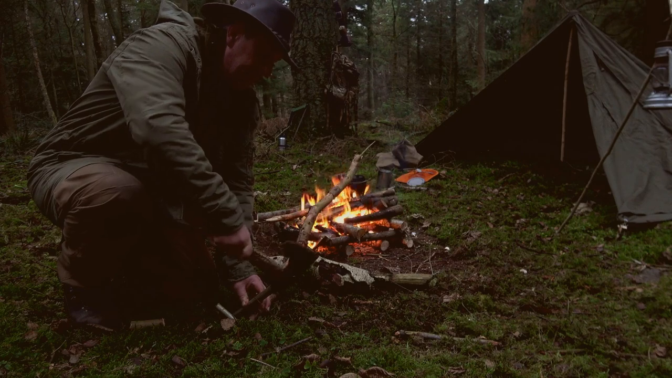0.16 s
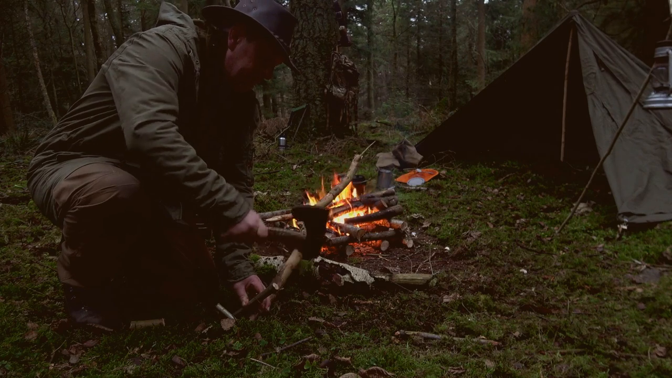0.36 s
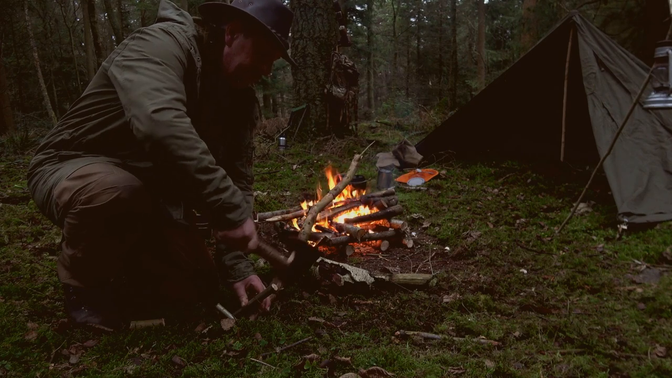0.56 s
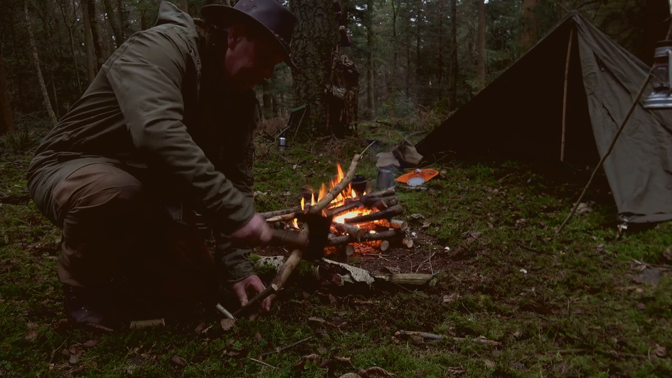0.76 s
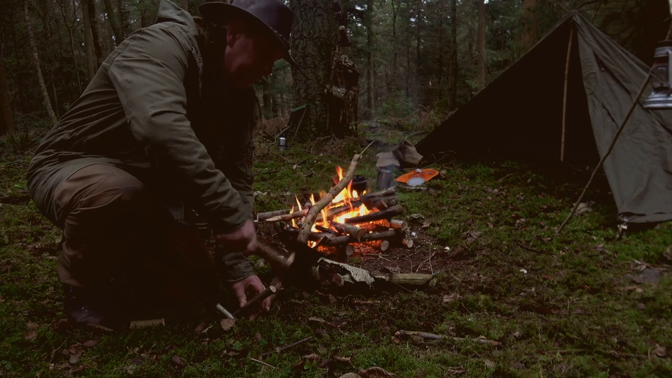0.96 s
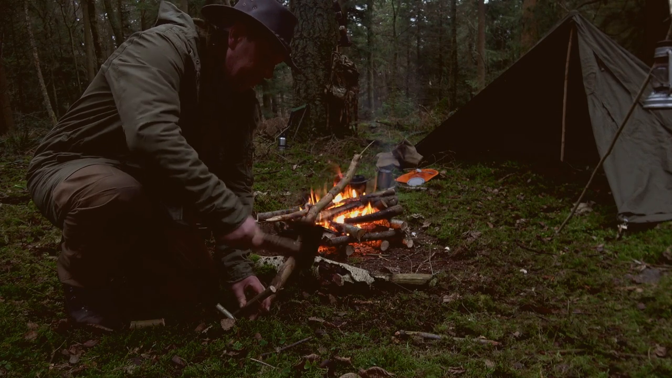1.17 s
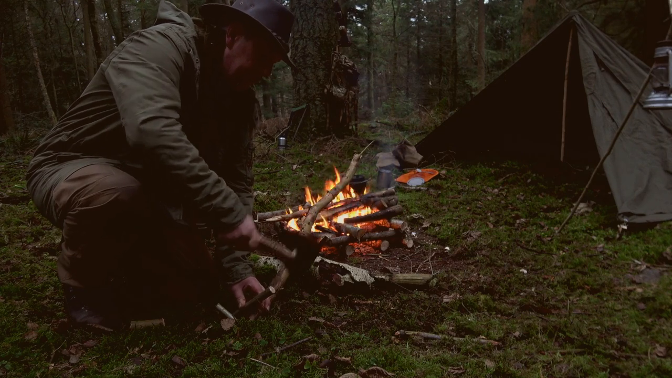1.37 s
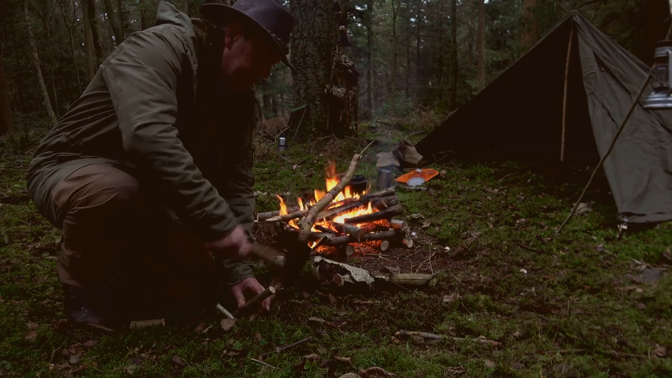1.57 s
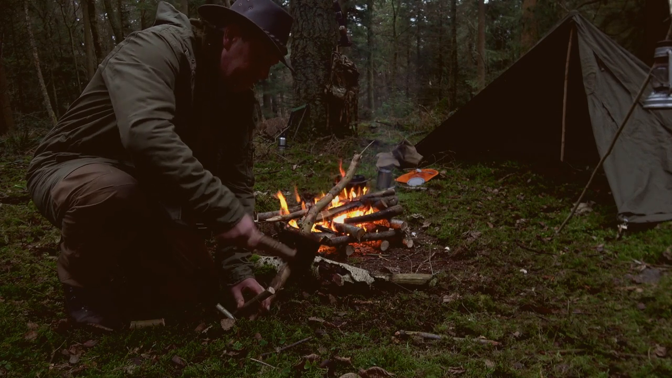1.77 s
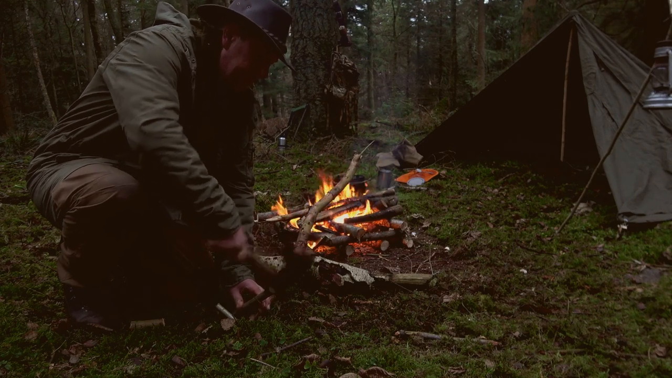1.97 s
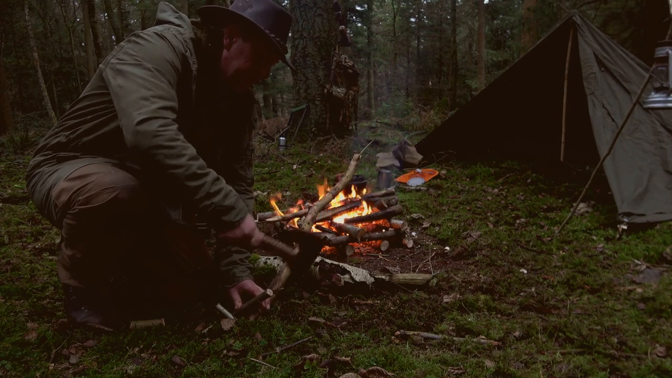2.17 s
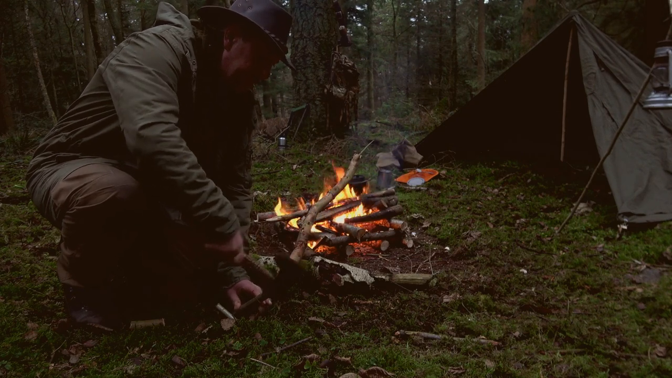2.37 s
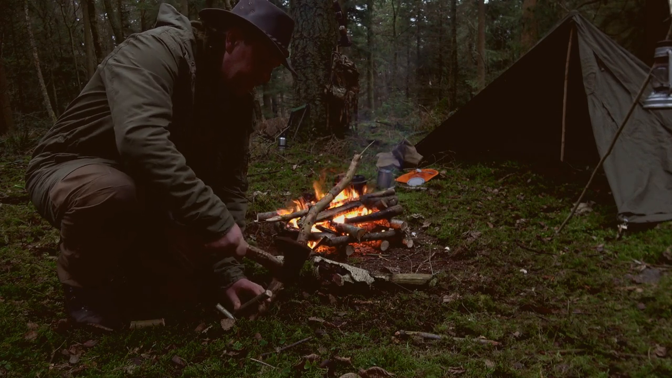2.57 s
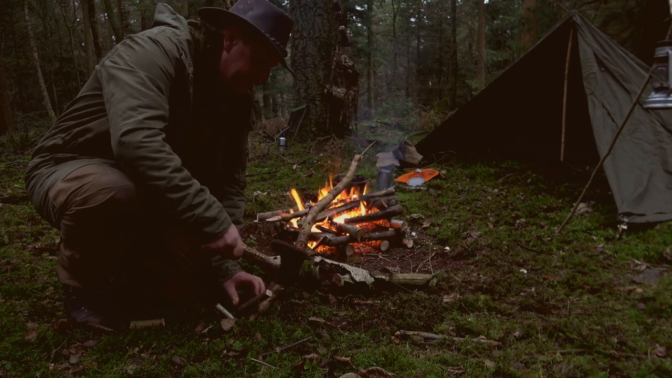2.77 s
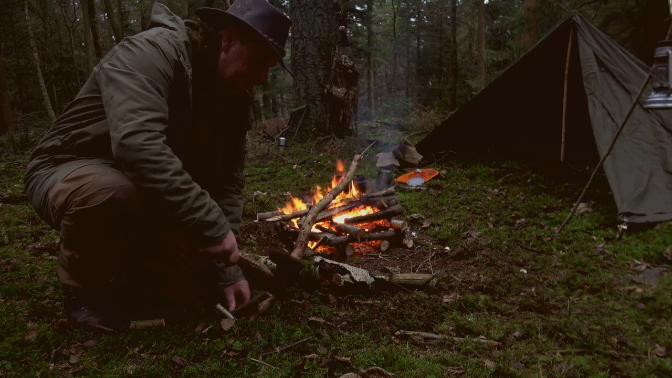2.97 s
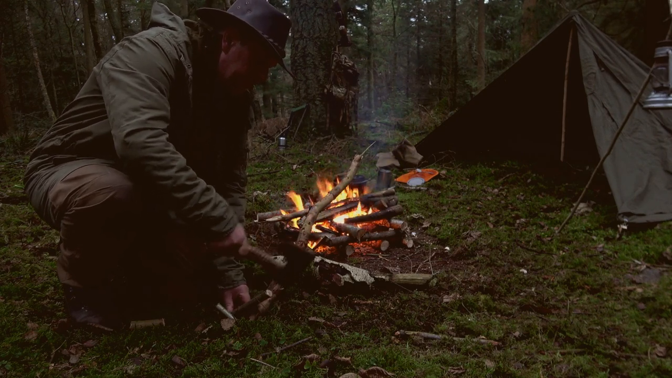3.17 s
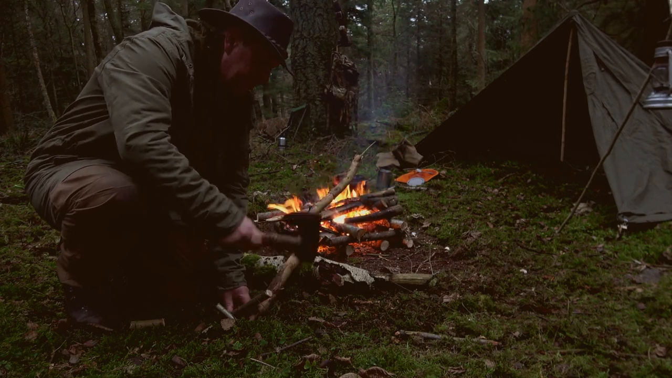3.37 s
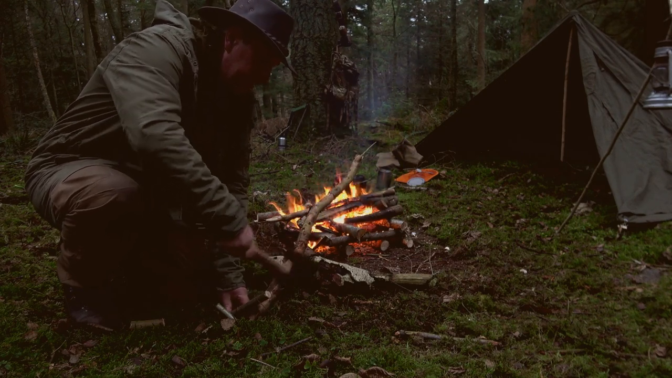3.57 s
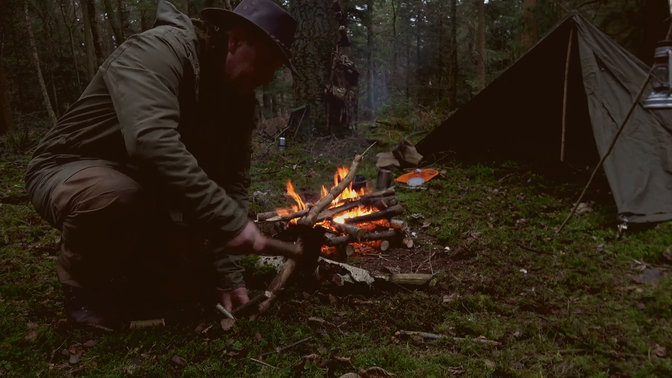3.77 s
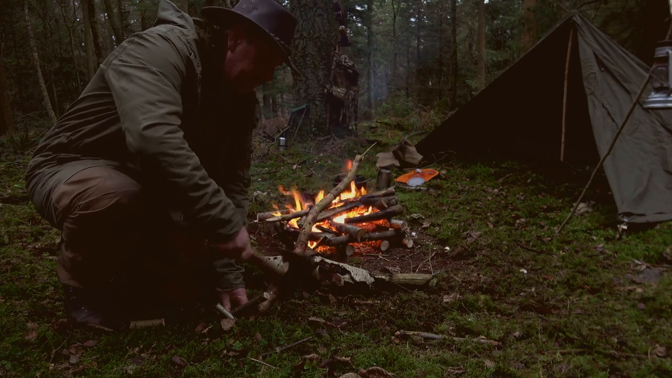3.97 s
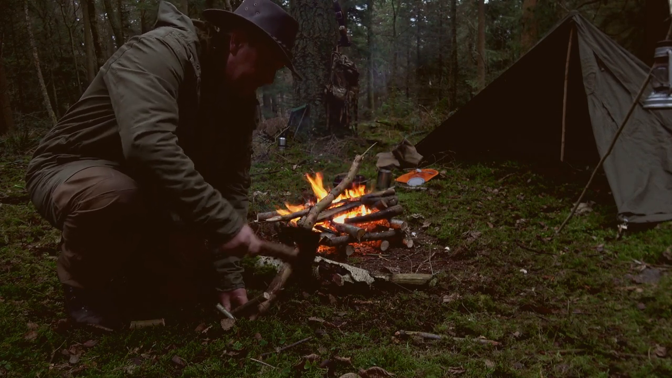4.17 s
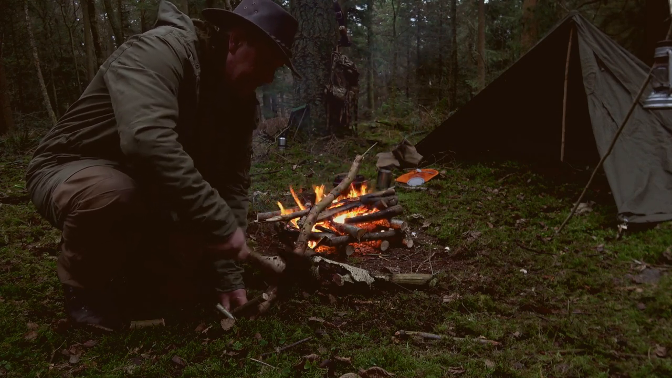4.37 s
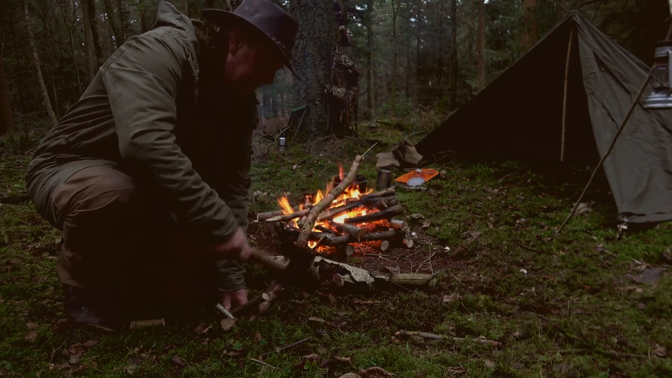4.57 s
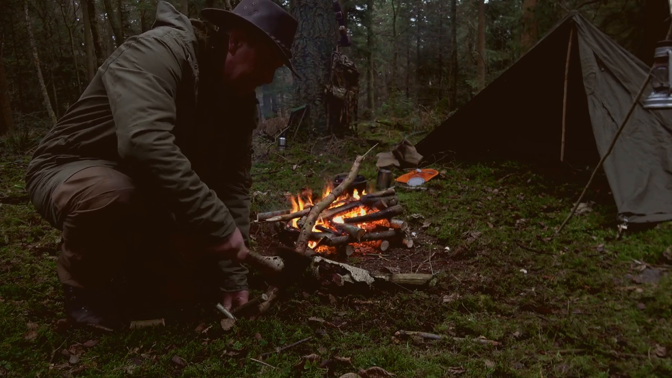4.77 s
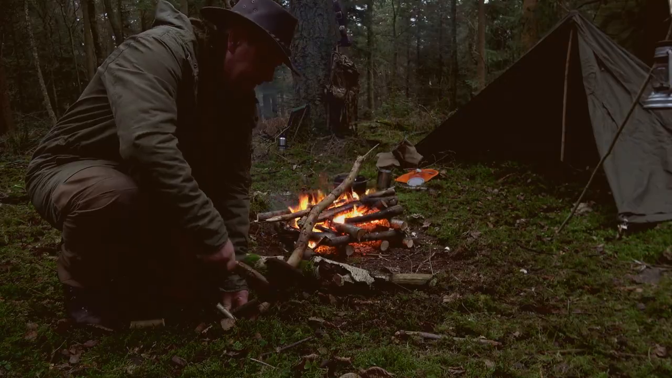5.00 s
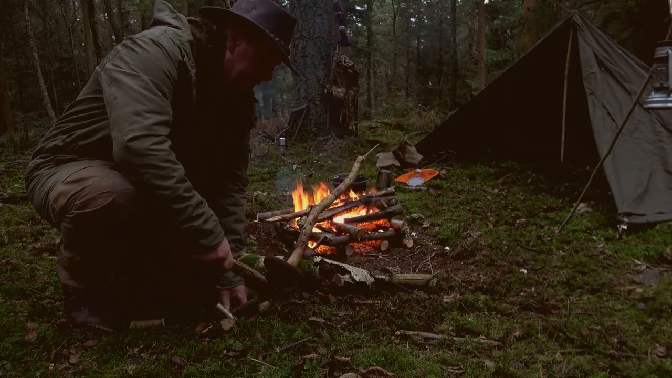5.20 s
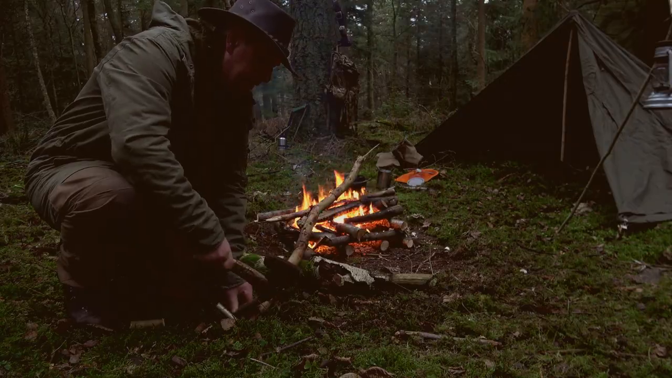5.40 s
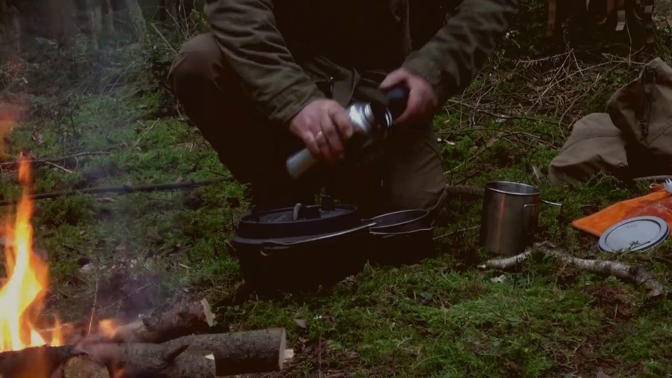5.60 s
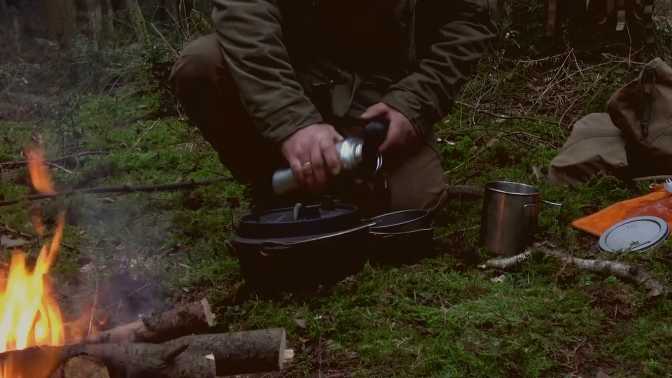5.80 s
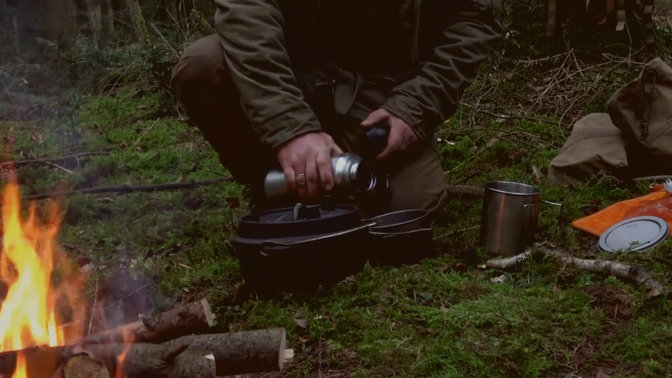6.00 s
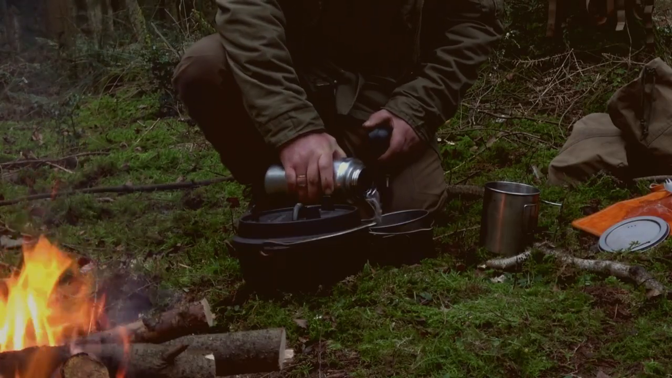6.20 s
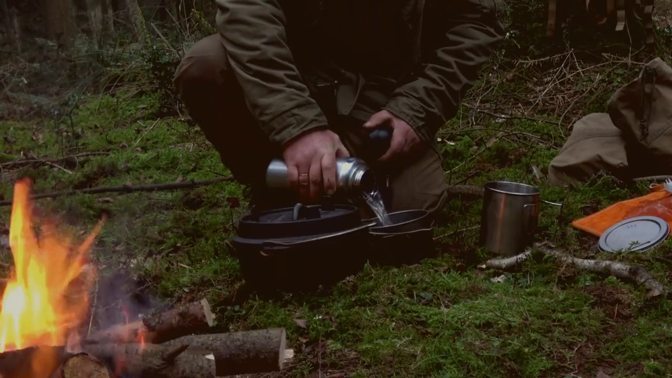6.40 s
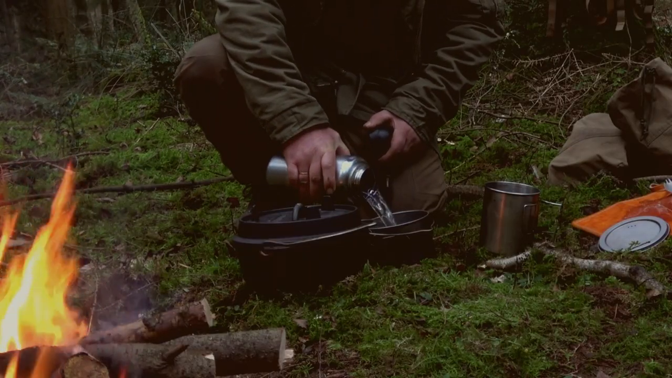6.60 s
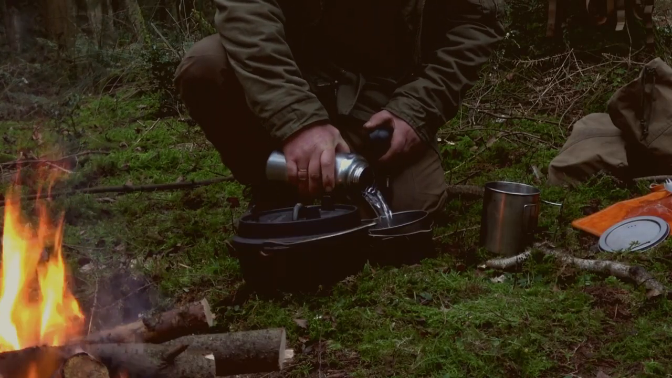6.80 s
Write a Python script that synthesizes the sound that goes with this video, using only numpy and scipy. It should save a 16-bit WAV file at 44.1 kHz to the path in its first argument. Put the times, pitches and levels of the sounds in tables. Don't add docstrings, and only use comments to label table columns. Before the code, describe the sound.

Outdoors in a forest, a hatchet strikes a stick on a log about every 0.4 seconds, with one pause midway. Each sharp woody knock has a splintery edge, a short log thud and a soft low ground thump. Fire hisses and crackles throughout, with wind buffeting the microphone. After the last blow the fire sounds closer, on the left, and water briefly trickles into a pan.

```python
import sys
import numpy as np
from scipy import signal
from scipy.fft import rfft, irfft, next_fast_len
from scipy.io import wavfile
from scipy.ndimage import uniform_filter1d

SR = 44100
rng = np.random.default_rng(int(sys.argv[2]) if len(sys.argv) > 2 else 0)


def store_pcm(level_fs):
    pcm = np.round(np.clip(level_fs, -1, 1) * 32767).astype(np.int16)
    wavfile.write(sys.argv[1], SR, np.atleast_2d(pcm).T)


def volts_from_db(level):
    exponent = np.asarray(level, float) / 20
    return 10 ** exponent


N = 302085
SCENE_CHANGE_S = 5.553

# frequency in Hz, level in dB per Hz.
ROAR_COLOUR = [(30, -32), (55, -2), (259, -13.5), (420, -16), (752, -14), (1240, -13.5), (1500, -22.5),
               (4500, -43.5)]
FAR_HISS_COLOUR = [(1290, -20), (2200, -5.5), (3130, -9.5), (4360, -3.5), (6500, -4.5), (10300, -6.5),
                   (15750, -9.5), (15950, -53)]
NEAR_HISS_COLOUR = [(1290, -7), (2200, 0), (3400, -13), (4000, -5.5), (7160, -1.5), (9860, -9.5),
                    (15750, -7.5), (15950, -45)]
GUST_COLOUR = [(4, -15), (11, -1.5), (22, -6), (35, -12.5), (60, -23), (120, -37), (250, -50.5), (500, -81)]
WOOD_TAIL_COLOUR = [(150, -15), (400, 1), (1200, -7), (2000, -2), (2500, -11.5), (2900, -16.5), (6000, -24),
                    (16000, -36)]
# frequency in Hz, likeness from 0 to 1.
LIKENESS = [(60, 0.61), (180, 0.33), (550, 0.52), (1650, 0.73), (4970, 0.44), (15000, 0.08)]

# time in seconds, level in dB.
BLAZE = [(0, -3.5), (.5, -3.5), (1.14, -0.5), (1.4, -0.5), (2.6, -2), (3.4, 1.5), (4.7, -2), (5.7, -1),
         (6.85, 0)]
# pitch in Hz, width in Hz, level in dB against the hiss.
SAP_STEAM = [
    (4540, 2800, -9),
    (6200, 620, -14.5),
    (7500, 790, -14),
]
# time in seconds, level in dB.
WIND = [(0, -39), (.1, -49.5), (.17, -26.5), (.4, -39), (.55, -31.5), (.78, -27), (1.05, -33.5), (1.3, -27),
        (1.55, -32.5), (1.73, -16.5), (1.96, -20), (2.03, -27.5), (2.25, -29.5), (2.92, -39), (3.14, -26),
        (3.25, -35), (5.0, -51), (6.85, -50.5)]

# start in seconds, peak in dB, pitch in Hz, body in dB, left-right in dB.
SNAPS = [(0.165, -59, 2940, 23, 4), (0.3539, -32.5, 5370, -6, 3), (0.4668, -33.5, 4200, 8, 2),
         (0.8778, -37.5, 3200, 7, 0), (0.9399, -34.5, 7930, -6, -6), (0.9738, -36, 6250, 1, -6),
         (1.1168, -43.5, 7100, 10, 3), (1.935, -42.5, 3700, 0, 7), (2.34, -42, 3400, -6, -1.5),
         (2.378, -24, 4000, -4, 3), (2.4137, -39, 6460, -2, -7), (2.873, -36, 6000, 8, 3),
         (3.1705, -30.5, 6200, 1.5, 4), (3.711, -38, 6900, 8.5, 2), (4.133, -27, 7840, -1.5, 3.5),
         (5.7515, -29.5, 3060, 6, 7)]
# start in seconds, peak in dB, pitch in Hz, left-right in dB.
TICKS = [(0.0058, -33.5, 6100, 3.5), (1.9287, -44, 9600, 0), (2.0112, -42, 11000, 1),
         (0.5764, -40, 4240, -9), (1.0504, -38.5, 9500, -5), (1.1337, -33, 7060, 7),
         (1.2284, -41, 6250, -1), (1.3434, -22, 7450, -5), (1.7194, -42, 8170, 1),
         (2.0044, -23.5, 10200, -4), (2.1843, -42.5, 8400, -4), (2.635, -47, 7700, -16),
         (2.833, -33, 8200, -3), (3.026, -36.5, 5900, 0), (3.061, -43, 3380, 4), (3.1485, -39, 5770, 1.5),
         (3.1887, -40, 7000, -8), (3.2083, -37.5, 6700, 7), (3.284, -37, 7700, -3),
         (3.3175, -25.5, 6200, -4.5), (3.447, -33, 3770, 4), (3.5647, -43, 10400, 2),
         (3.7777, -26, 7880, -4), (3.8171, -44, 8050, -1), (4.372, -36.5, 4910, 8), (4.3963, -42, 7750, -7),
         (4.509, -34.5, 9800, 7), (4.559, -42, 9500, -1), (4.688, -34.5, 5000, 3), (4.747, -44, 5470, 3),
         (5.108, -40, 5960, -0.5), (5.122, -43, 6200, 0), (.125, -48, 5000, 0), (2.676, -46, 8000, 0),
         (1.782, -44, 9500, 0), (4.495, -53, 11000, 0), (6.138, -40.5, 8000, 5.5), (6.443, -39, 11000, 4),
         (6.333, -43, 10000, 4), (6.269, -41, 8000, 4), (6.4375, -39, 5000, 4)]
# start in seconds, peak in dB, pitch in Hz.
NEAR_TICKS = [(5.5608, -28.5, 5560), (5.7015, -34.5, 5700), (5.7197, -27.5, 6200), (5.8628, -31.5, 5440),
              (5.869, -38, 4020), (6.169, -33, 4330), (6.2254, -20, 5640), (6.2656, -31.5, 6940),
              (6.341, -31.5, 6900), (6.355, -42, 6000), (6.408, -35, 5500), (6.4241, -15, 6980),
              (6.4313, -26.5, 7160)]
# start in seconds, peak in dB, pitch in Hz, time to fade 60 dB in seconds.
TICK_CORES = [(.3541, -42.5, 2300, .005), (1.0507, -49, 3600, .004), (1.134, -42, 2800, .004),
              (1.2287, -48, 3500, .004), (1.3437, -34, 3700, .005), (2.0046, -35, 3400, 0.0074),
              (2.0047, -40, 2000, .006), (2.3783, -40, 2620, .005), (3.0273, -41, 3280, .005),
              (3.3178, -41, 2000, 0.0068), (3.7781, -41, 2200, .006), (3.7781, -41, 4200, .004),
              (4.1333, -41, 2200, .006), (4.141, -41, 230, 0.028), (4.5093, -44, 4000, .004),
              (4.5093, -49, 2200, .005), (4.6883, -48, 2300, .005), (1.337, -42, 6000, .004)]

# start in seconds, knock peak in dB, then stick, edge and splinter in dB against the knock.
CHOPS = [(0.1911, -8.5, -4, -9, -9.5), (0.5555, -9, 0, 0, -6.5), (0.9211, -6.5, 4.5, -1, -9.5),
         (1.3209, -7.5, -5, -2, -3.5), (1.6925, -13, -4, -28, 4.5), (2.0723, -3.5, -12, -4, -7.5),
         (2.465, -13.5, 0.5, -9, -13), (3.55, -7, 0, -1, -3), (3.9314, -7.5, 3, 7, -10.5),
         (4.335, -9.5, 2, 0.5, -18), (4.7085, -17.5, 13, 3.5, -2.5), (5.057, -9, -1.5, -13, -3)]
# log in Hz, upper log in Hz, knock in Hz, stick in Hz,
# split-face peak in dB.
WOOD_PITCHES = [(271, 672, 1280, 1780, -10), (282, 690, 1237, 2025, -19), (234, 830, 1236, 2050, -25.5),
                (389, 604, 1214, 1790, -25), (433, 600, 1103, 2130, -46), (218.5, 760, 1160, 1970, -43),
                (292, 670, 1310, 1950, -18), (276, 740, 1225, 2056, -11), (233, 614, 1245, 1990, -9.5),
                (231, 660, 1380, 1990, -10.5), (428, 693, 1390, 1974, -36), (367, 692, 1434, 2120, -17)]
# thud peak in dB, second thud in Hz, its level in dB against the first,
# upper peak in dB, shove into the soil in dB.
LOG_BLOWS = [(-18, 390, -22.5, -19, -23.5), (-18, 345, -10, -19, -21), (-22.5, 418, -4, -19, -23),
             (-19, 180, -1.5, -35, -20), (-15.5, 262, -4.5, -35, -22.5), (-22.5, 475, -2, -22.5, -23.5),
             (-19.5, 340, -7, -20, -23.5), (-18.5, 377, -13.5, -24.5, -21.5), (-23.5, 610, -1, -24.5, -21),
             (-20.5, 364, -5, -17, -23), (-17, 326, -2, -19, -24), (-17.5, 286, -4, -21, -22.5)]
# edge in Hz, split face in Hz, splinter in Hz, lateness in ms.
BRIGHT_PITCHES = [(3600, 2910, 7000, -0.19), (4200, 3700, 6850, -0.13), (4580, 3300, 8500, -1),
                  (4400, 2500, 7300, 0), (4080, 3100, 6500, -0.24), (4100, 2800, 6640, -.3),
                  (4160, 2540, 7200, 0.24), (4030, 2750, 6700, -1.4), (3920, 2720, 6700, -.5),
                  (4040, 2720, 5600, 0), (4100, 4600, 8360, -0.26), (3750, 2830, 6100, -1.1)]
# multiple of the part's pitch, level in dB, time to fade 60 dB in seconds.
KNOCK_MODES = [(.85, -48, 0.0046), (1, 17.5, 0.012), (1.28, -5, 0.042)]
STICK_MODES = [(.88, 0.5, 0.0024), (0.999, 1.5, 0.015), (1.141, -16.5, 0.012)]
EDGE_MODES = [(.8, -4.5, 0.0036), (1, 0.5, 0.0052), (1.25, -10, 0.0027), (1.5, -9.5, .003),
              (1.9, -13.5, .003), (2.6, -21, .003)]
SPLINTER_MODES = [(.69, -6, .004), (.87, -3, .005), (1, 0, .006), (1.24, -7, .004), (1.57, -13, .003)]
UPPER_LOG_MODES = [(0.98, 0, 0.034)]
SPLIT_FACE_MODES = [(1, 0, 0.0043)]
# pitch in Hz, peak in dB, time to fade 60 dB in seconds.
LOG_RING = [(205.8, -41, .06), (556, -30.5, 0.078), (1510, -34, 0.053)]
# start in seconds, peak in dB,
# pitch in Hz.
REBOUNDS = [(.0058, -44, 1530), (.0059, -36, 2590), (.248, -52, 2020), (.576, -33, 2040),
            (0.9334, -18, 744), (0.935, -22.5, 1190), (1.375, -43.5, 1770), (1.713, -36.5, 1970),
            (2.081, -19.5, 1150), (2.09, -21, 753), (3.95, -47, 2000), (4.134, -45, 456),
            (4.728, -52, 1930), (5.7502, -33.5, 1040), (5.7502, -42, 520)]
# start in seconds, peak in dB, pitch in Hz, time
# to fade 60 dB in seconds.
SHORT_RINGS = [(.1915, -25, 4900, .004), (.192, -25, 960, 0.0072), (.19194, -25.5, 3600, .005),
               (.5564, -26, 770, .01), (.55625, -17, 2030, .012), (1.3213, -19, 1010, .008),
               (2.073, -20, 4350, .006), (2.0736, -23, 900, .01), (2.4658, -24, 690, 0.013),
               (2.467, -28, 400, 0.023), (3.5515, -29, 550, .015), (3.5505, -23.5, 3500, .006),
               (4.3358, -26, 690, .012), (4.709, -27, 600, 0.014), (.9225, -26, 290, .025),
               (.9219, -21, 3400, .005), (.5565, -35, 2200, .008), (.5565, -29, 2700, 0.0055),
               (.9221, -15, 2350, .007), (.9221, -25, 2900, .006), (.9225, -23, 460, .025), (.934, -31, 745, .09),
               (1.3212, -18, 2700, .007), (1.344, -30, 3600, .008), (1.6935, -18.5, 680, 0.016),
               (2.0735, -21, 460, .02), (2.085, -31, 750, .1), (2.466, -14, 3400, 0.0054),
               (2.4661, -19, 1900, 0.01), (3.5522, -30, 370, 0.018), (3.5506, -17, 1030, 0.0086),
               (3.9322, -20, 1540, .01), (6.2257, -30, 4600, .004), (6.4244, -27, 4400, .004),
               (1.693, -29, 4900, .004), (2.073, -26, 3750, .005), (.1918, -24, 1560, .01),
               (3.9383, -28.5, 6700, .005), (3.9532, -40, 4250, .015), (3.9325, -20.5, 660, .02),
               (3.9322, -20, 2350, 0.0055), (3.9334, -15.5, 5800, .005), (4.3375, -18, 5400, 0.0055),
               (5.058, -10.5, 1200, 0.0088), (5.068, -37, 1400, .03), (5.069, -42, 2100, .025)]
# time of the blow in seconds, level in dB.
GRAZES = [
    (1.693, -34),
    (2.465, -35.5),
]

# start in seconds, end in seconds, pitch in Hz, level in dB.
WHISTLES = [
    (4.78, 5.03, 7450, -68),
    (2.55, 2.75, 5800, -76),
]
# time in seconds, fizz level in dB.
POUR_FLOW = [(0, -100), (6.575, -82), (6.605, -60), (6.645, -64), (6.685, -59), (6.72, -57), (6.755, -53),
             (6.78, -56), (6.85, -53)]
# start in seconds, peak in dB, pitch in Hz, time to fade 60 dB in seconds.
BUBBLES = [(6.598, -47, 10900, 0.018), (6.608, -41, 5870, 0.034), (6.618, -35, 8000, 0.015),
           (6.669, -43, 4820, 0.04), (6.679, -39, 4780, 0.04), (6.691, -40, 6200, 0.027),
           (6.715, -53, 5800, 0.018), (6.73, -52, 4400, 0.034), (6.738, -49, 9300, 0.037),
           (6.749, -42, 8100, 0.018), (6.76, -36, 5600, 0.02), (6.802, -40, 3960, 0.034),
           (6.839, -38, 1290, .04), (6.755, -36, 910, 0.022), (6.82, -32, 756, 0.026),
           (6.837, -36, 713, 0.094), (6.84, -38, 1800, 0.053)]
# start in seconds, peak in dB, pitch in Hz.
DROPLETS = [(6.609, -43, 6900), (6.622, -47, 9800), (6.638, -48, 4100), (6.68, -47, 9900),
            (6.695, -43, 5200), (6.698, -46, 11100), (6.713, -43, 5900), (6.722, -47, 9400),
            (6.758, -44, 4600), (6.762, -42, 6300), (6.764, -48, 2600), (6.785, -45, 5200),
            (6.797, -45, 4320), (6.806, -42, 5000), (6.811, -44, 7600), (6.841, -44, 9000),
            (6.843, -42, 4700), (6.575, -44, 1150), (6.616, -45, 1240), (6.77, -44, 1500)]


def rms_one(x):
    return x / np.sqrt(np.mean(x ** 2) + 1e-20)


def in_time(rows):
    s, value = np.transpose(rows)
    return np.interp(np.arange(N) / SR, s, value)


def at_hz(points, hz):
    point_hz, value = np.transpose(points)
    return np.interp(np.log(hz), np.log(point_hz), value)


def filtered(x, order, hz, kind):
    return signal.sosfilt(signal.butter(order, hz, kind, fs=SR, output="sos"), x)


def drift(rate_hz):
    r = np.exp(-80 * np.pi * rate_hz / SR)
    slow = signal.lfilter([1], [1, -2 * r, r * r], rng.standard_normal(N // 40 + 2002))[2000:]
    return np.interp(np.arange(N) / 40, np.arange(len(slow)), rms_one(slow))


def ring(clicks, hz, t60):
    r = volts_from_db(-60 / (t60 * SR))
    w = 2 * np.pi * min(hz, SR / 2.2) / SR
    return signal.lfilter([0, np.sin(w)], [1, -2 * r * np.cos(w), r * r], clicks + 1e-18)


def tapped(hz, t60):
    click = np.zeros(SR // 5)
    click[0] = 1
    return ring(click, hz, t60)


def struck(force, modes, detune, unit_hz=1):
    x = 0
    for ratio, db, t60 in modes:
        luck_db, stray = rng.standard_normal(2) * [1.5, detune]
        x = x + volts_from_db(db + luck_db) * ring(force, unit_hz * ratio * (1 + stray), t60)
    return x / np.abs(x).max()


def coloured(spectrum, size, alike=None):
    hz = np.maximum(np.fft.rfftfreq(size, 1 / SR), 1)
    mid, side = rfft(rng.standard_normal((2, size))) * volts_from_db(at_hz(spectrum, hz))
    c = np.clip(at_hz(LIKENESS, hz) if alike is None else alike, 0, 1)
    return rms_one(irfft(np.sqrt(1 + c) * mid + np.sqrt(1 - c) * side * [[1], [-1]], size))


def add(out, s, sound, pan_db=0):
    i = round(s * SR)
    out[:, i:i + sound.shape[-1]] += (sound * volts_from_db([[pan_db / 2], [-pan_db / 2]]))[:, :N - i]


def at_ports(x, lag_s):
    size = next_fast_len(N)
    lag = np.exp(-2j * np.pi * np.fft.rfftfreq(size, 1 / SR) * np.array([[0], [lag_s]]))
    return irfft(rfft(x, size) * lag, size)[:, :N]


def sap(swing_db=4):
    out, white = 0, rng.standard_normal((2, N))
    for hz, width_hz, db in SAP_STEAM:
        wheeze = filtered(white, 1, [hz - width_hz / 2, hz + width_hz / 2], "band")
        out = out + volts_from_db(db + swing_db * drift(5.7)) * rms_one(wheeze)
    return out


def forest():
    near = np.arange(N) >= SCENE_CHANGE_S * SR
    blaze_db, size = in_time(BLAZE), next_fast_len(N)
    roar_db = -55.5 + 0.63 * blaze_db + 5 * near + 2 + .7 * drift(8)
    hiss_db = -61 + blaze_db + 4 * near + 1 + .6 * drift(15)
    roar = coloured(ROAR_COLOUR, size)[:, :N] * volts_from_db(roar_db)
    far_hiss = coloured(FAR_HISS_COLOUR, size)[:, :N]
    near_hiss = coloured(NEAR_HISS_COLOUR, size, alike=0.04)[:, :N]
    hiss = (np.where(near, near_hiss, far_hiss) + sap()) * volts_from_db(hiss_db)
    return roar * volts_from_db([[.9], [-.9]]) + hiss * volts_from_db([[.3], [-.3]])


def wind():
    lumps = volts_from_db([2 * drift(5), 2 * drift(5)])
    gust = coloured(GUST_COLOUR, next_fast_len(N), alike=0.35)[:, :N]
    gust = gust / np.sqrt(uniform_filter1d(gust ** 2, SR // 6))
    strength_db = np.maximum(in_time(WIND), -55)
    return volts_from_db(strength_db - 3.0) * rms_one(gust * lumps) * volts_from_db([[1.5], [-1.5]])


def crackle(per_s=60, level_db=-52):
    sizes = volts_from_db(np.minimum(rng.exponential(1, N), 4)) * (rng.random(N) < per_s / SR)
    dealt = rng.integers(0, 8, N)
    pitches = np.geomspace(2000, 12000, 8)
    ticks = sum(ring(sizes * (dealt == k), hz, 12 / hz) for k, hz in enumerate(pitches))
    return volts_from_db(level_db) * ticks * np.ones((2, 1))


def pops():
    out, t = np.zeros((2, N)), np.arange(SR // 40) / SR
    echo_share, echo_cycles = 0.2, 1.7
    ticks = [(s, db, hz, -7, pan_db) for s, db, hz, pan_db in TICKS]
    near_ticks = [(s, db, hz, -15, 4) for s, db, hz in NEAR_TICKS]
    for s, db, hz, body_db, pan_db in SNAPS + near_ticks + ticks:
        spark = (t == 0) + 0.048 * rng.standard_normal(len(t)) * np.exp(-t / 0.0023)
        spark = spark + echo_share * np.roll(spark, round(echo_cycles / hz * SR))
        edge_db = 11 if s > SCENE_CHANGE_S else -7.5
        edge = volts_from_db(edge_db) * filtered(spark, 2, 11000, "high")
        click = filtered(spark, 2, [2660, 10500], "band")
        click = filtered(click, 1, [0.88 * hz, min(2.9 * hz, 16000)], "band")
        modes = [(1.17, 6.0, 0.003), (1.3, 1.0, 0.0058), (0.67, -49.0, 0.00067)]
        bright = struck(click, modes, 0.12, hz) + 2.67 * click / np.abs(click).max()
        dull = filtered(spark, 2, [700, 2920], "band")
        body_ring = struck(dull, [(1230, 0.0081, 0.0025), (2320, 0, 0.02)], 0.094)
        body = dull / np.abs(dull).max() + 0.13 * body_ring
        pop = volts_from_db(db - 2) * (bright + edge + volts_from_db(body_db - 3) * body)
        add(out, s + .0003, pop[None], np.clip(pan_db, -7, 7))
    return out


def rebounds():
    out = np.zeros((2, N))
    for s, db, hz in REBOUNDS:
        add(out, s, volts_from_db(db) * tapped(hz, 22 / hz)[None], pan_db=0.5)
    return out


def edge_bite(t):
    tear = 0.48 * rng.standard_normal(len(t)) * np.exp(-(t / 0.0019) ** 2) * (rng.random(len(t)) < .15)
    bite = tear + .5 * (t == 0)
    bite[round(.00025 * SR)] -= 1
    return filtered(bite, 2, [600, 7000], "band")


def stick_rattle(t, level_db):
    taps = rng.standard_normal(len(t)) * np.exp(-t / 0.011) * (rng.random(len(t)) < .02)
    return filtered(volts_from_db(level_db) * taps, 2, 2200, "low")


def splinter_snap(t):
    snap = np.zeros(len(t))
    snap[round(.0037 * SR)] = 1
    snap[round(.0069 * SR)] = volts_from_db(-17)
    return snap + 0.6 * np.roll(snap, -round(.00031 * SR))


def chops():
    out, t = np.zeros((2, N)), np.arange(SR // 5) / SR
    spread = .012
    log_ring = sum(volts_from_db(db) * tapped(hz, t60) for hz, db, t60 in LOG_RING) * np.clip(t / 0.012, 0, 1)
    for chop, pitches, log_blow, bright in zip(CHOPS, WOOD_PITCHES, LOG_BLOWS, BRIGHT_PITCHES):
        s, db, stick_db, edge_db, splinter_db = chop
        log_hz, upper_hz, knock_hz, stick_hz, face_db = pitches
        thud_db, side_hz, side_db, upper_db, _ = log_blow
        edge_hz, face_hz, splinter_hz, _ = bright
        tail_db = -23.5 + db + 10 * np.log10(1 + volts_from_db(stick_db) ** 2)
        bite, rattle, snap = edge_bite(t), stick_rattle(t, tail_db + 11.0), splinter_snap(t)

        wood = struck(bite + rattle, KNOCK_MODES, spread, knock_hz)
        wood += volts_from_db(stick_db) * struck(bite + rattle, STICK_MODES, spread, stick_hz)
        wood = filtered(wood, 2, 0.55 * knock_hz, "high")
        wood += volts_from_db(edge_db) * (struck(bite, EDGE_MODES, 0.0087, edge_hz) + 0.094 * bite)
        wood += volts_from_db(splinter_db) * struck(snap, SPLINTER_MODES, 0.013, splinter_hz)
        face = volts_from_db(face_db) * struck(bite, SPLIT_FACE_MODES, 0.011, face_hz)
        add(out, s + .0001, (volts_from_db(db) * wood + face)[None], pan_db=1.5)

        push = rattle + np.sin(np.pi * np.clip(t / .001, 0, 1))
        shove = np.roll(push, round(.0018 * SR)) - 0.41 * push
        thud_modes = [(log_hz, 0, 0.036), (side_hz, side_db, 0.023)]
        thud = volts_from_db(thud_db) * struck(filtered(shove, 2, 225, "high"), thud_modes, 0.0089)
        add(out, s - 0.0004, (thud + log_ring)[None], pan_db=4.5)
        upper = volts_from_db(upper_db) * struck(push, UPPER_LOG_MODES, spread, upper_hz)
        add(out, s + 0.0002, upper[None], pan_db=4.0)

        fade = (np.exp(-t / 0.0094) + 0.076 * np.exp(-t / 0.084)) * np.clip(t / 0.0037, 0, 1)
        add(out, s, volts_from_db(tail_db) * fade * coloured(WOOD_TAIL_COLOUR, len(t), alike=0.53))
    return out


def rings_and_cores():
    out = np.zeros((2, N))
    for s, db, hz, t60 in SHORT_RINGS + TICK_CORES:
        add(out, s, volts_from_db(db) * tapped(hz, t60)[None], pan_db=1.5)
    return out


def ground_wave(right_db=-3.0, after_db=-17):
    out, t = np.zeros((2, N)), np.arange(SR // 6) / SR
    # swings in Hz, then start, end and crest in seconds
    hz, start, end, crest = np.array([[85, 91], [.020, .013], [.069, .074], [.0478, .0460]])[:, :, None]
    packet = np.sin(np.pi * np.clip((t - start) / (end - start), 0, 1)) ** 0.68 * np.exp(-(t - .04) / .15)
    after = volts_from_db(after_db) * np.clip((t - end) / 0.014, 0, 1) * np.exp(-np.maximum(t - .09, 0) / 0.073)
    cross = [[0], [.2]] * np.cos(2 * np.pi * 121 * (t - .0454))
    swing = np.cos(2 * np.pi * hz * (t - crest)) - cross
    wave = volts_from_db([[0], [right_db]]) * (packet - after) * swing
    for (s, *_), (*_, shove_db), (*_, late_ms) in zip(CHOPS, LOG_BLOWS, BRIGHT_PITCHES):
        add(out, s + late_ms / 1000, volts_from_db(shove_db) * wave)
    return out


def grazes(length_s=0.021):
    out, t = np.zeros((2, N)), np.arange(round(length_s * SR)) / SR
    colour = [(300, 2), (1000, 6), (3000, -7.0), (8000, -6.0), (15000, -19.5)]   # Hz, dB per Hz
    for s, db in GRAZES:
        scrape = (t / length_s) ** 1.3 * coloured(colour, len(t), alike=0.38)
        add(out, s - length_s, volts_from_db(db) * scrape)
    return out


def whistles(width_hz=160):
    out = np.zeros((2, N))
    for start, end, hz, db in WHISTLES:
        t = np.linspace(0, 1, round((end - start) * SR))
        jet = filtered(rng.standard_normal(len(t)), 1, [hz - width_hz / 2, hz + width_hz / 2], "band")
        add(out, start, volts_from_db(db) * np.sin(np.pi * t) ** .4 * rms_one(jet)[None])
    return out


def pouring():
    out, t = np.zeros((2, N)), np.arange(SR // 20) / SR
    for s, db, hz, t60 in BUBBLES:
        small = min(hz / 4000, 1)
        rough = 1 + .5 * small * rng.standard_normal(len(t)).repeat(30)[:len(t)]
        tone = np.sin(2 * np.pi * hz * (t + 1.6 * t * t)) * rough
        splash = filtered(rng.standard_normal((2, len(t))), 1, [hz * 0.6, min(hz * 2.0, 15000)], "band")
        fade = volts_from_db(-60 * t / t60) * np.clip(t / (0.0019 + 2.2 / hz), 0, 1)
        add(out, s, volts_from_db(db) * (tone + 0.68 * small * splash) * fade)
    sizes = volts_from_db(5 * np.minimum(rng.exponential(1, (2, N)), 3)) * (rng.random((2, N)) < 3500 / SR)
    dealt = rng.integers(0, 16, N)
    pitches = np.geomspace(4000, 11500, 16)
    fizz = sum(ring(sizes * (dealt == k), hz, 40 / hz) for k, hz in enumerate(pitches))
    fizz = rms_one(fizz + 1.07 * fizz[::-1])
    return out + volts_from_db(in_time(POUR_FLOW) + 4.8 * drift(28.55)) * fizz


def droplets():
    out, t = np.zeros((2, N)), np.arange(SR // 30) / SR
    for s, db, hz in DROPLETS:
        fade = volts_from_db(-60 * t * np.sqrt(5000 * hz) / 60) * np.clip(t / .0012, 0, 1)
        chirp = np.sin(2 * np.pi * hz * (t + 2.5 * t * t))
        add(out, s, volts_from_db(db + 3.0) * (fade * chirp)[None], pan_db=1.5)
    return out


def scene():
    air = forest() + wind()
    fire = crackle() + pops()
    fire = np.where(np.arange(N) < SCENE_CHANGE_S * SR, fire, at_ports(fire, .000024))
    wood = at_ports(rebounds() + chops() + rings_and_cores() + grazes(), .00002)
    water = pouring() + droplets()
    return air + fire + wood + ground_wave() + whistles() + water


def roll_off(x):
    return signal.sosfilt(signal.butter(12, 17000, fs=SR, output="sos"), x)


def record(dry):
    top = .8
    flat = dry / (1 + np.abs(dry / top) ** 4) ** .25
    treble_end = signal.cheby2(8, 40, 17200, fs=SR, output="sos")
    return roll_off(signal.sosfilt(treble_end, flat))


dry = scene()
out = record(dry)
store_pcm(out)
```